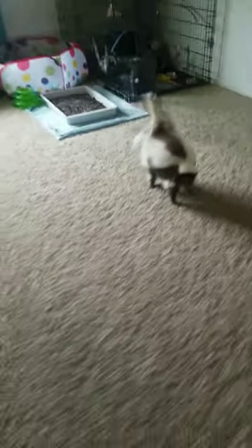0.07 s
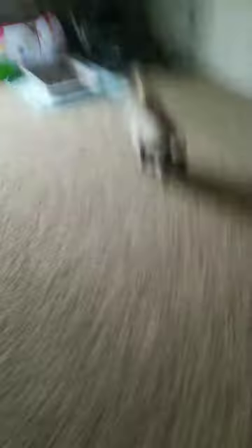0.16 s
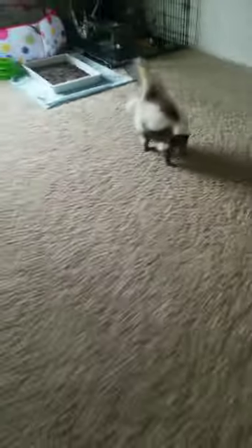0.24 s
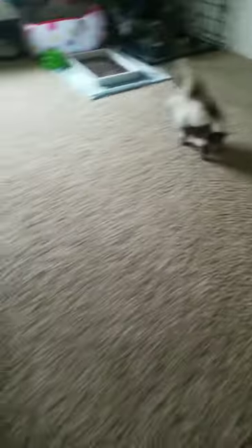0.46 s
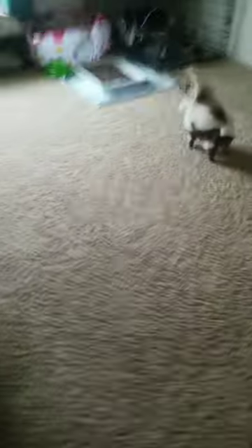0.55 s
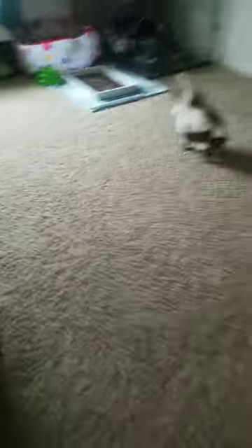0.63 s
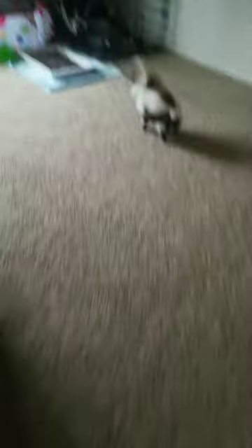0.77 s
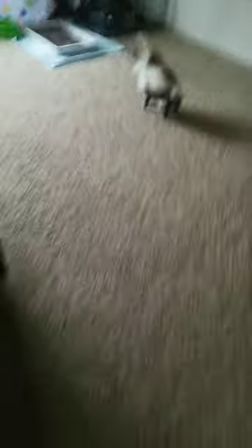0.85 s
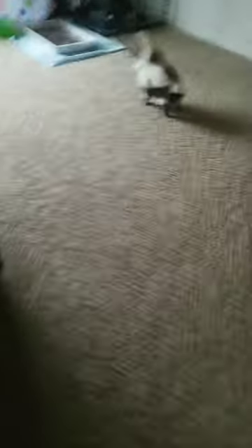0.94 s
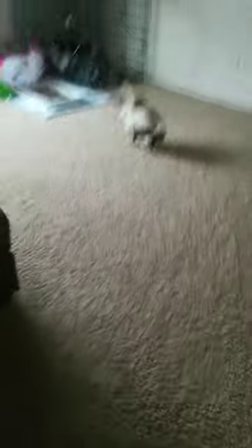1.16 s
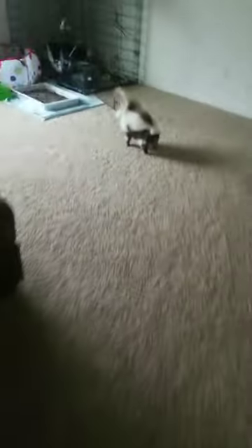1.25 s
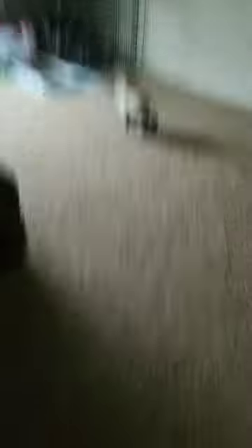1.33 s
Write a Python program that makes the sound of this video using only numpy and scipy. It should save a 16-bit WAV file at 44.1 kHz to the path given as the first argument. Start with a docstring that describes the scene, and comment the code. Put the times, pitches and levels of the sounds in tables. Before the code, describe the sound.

Close, muffled handling noise on a camera's case: a sharp tap, a short scratchy swell of rubbing and a few light knocks before it settles. Behind it, a skunk pads softly over carpet in a quiet room.

```python
"""A quiet room, heard from the microphone of a hand-held camera following a skunk over carpet.
Over the room's rumble and hiss, fingers rub the camera's case, close and dull. Farther off the pile
swishes faintly and soft footfalls thud through the floor. Light knocks on the case surround one hard
tap at 0.27 s. Near 0.75 s the rubbing swells and a finger catches, rasps and tears loose.
A few more knocks, swishes and thuds follow, and the hand settles."""
import sys
import numpy as np
from scipy import signal
from scipy.fft import rfft, irfft
from scipy.io import wavfile
from scipy.ndimage import uniform_filter1d

SR = 44100
rng = np.random.default_rng(int(sys.argv[2]) if len(sys.argv) > 2 else 0)


def pcm_store(signal):
    """Save signal as 16-bit PCM."""
    levels = np.round(np.clip(np.atleast_2d(signal), -1, 1) * 32767)
    wavfile.write(sys.argv[1], SR, levels.astype(np.int16).T)


N = 61739

# room tone, all around the microphone: f/Hz, relative density/dB
ROOM_SPECTRUM = [(20, -2.5), (45, 2), (70, 2), (150, -5.5), (300, -22), (600, -28.5), (900, -35.5),
                 (1130, -31), (1350, -22.5), (2400, -23.5), (3100, -39), (4700, -37), (5600, -33),
                 (6300, -29), (7300, -42), (9000, -41), (10100, -36.5), (11200, -41), (12500, -38.5),
                 (15500, -41)]
# slight drift of the room tone: t/s, level/dB
ROOM_DRIFT = [(0, -59.5), (0.35, -56.5), (0.48, -61), (0.7, -59.5), (1.15, -60.5), (1.28, -60.5),
              (1.4, -60.5)]
# how hard the hand rubs the case, right at the microphone: t/s, level/dB
RUB_LEVEL = [(0, -46.5), (0.05, -70.5), (0.2, -54), (0.255, -54), (0.29, -44), (0.33, -49.5), (0.375, -54),
             (0.405, -47.5), (0.46, -56), (0.505, -61), (0.53, -49), (0.565, -49.5), (0.6, -55),
             (0.64, -56), (0.685, -51.5), (0.704, -40.5), (0.728, -42), (0.745, -35), (0.778, -38.5),
             (0.826, -54.5), (0.838, -60.5), (0.85, -38.5), (0.875, -37), (0.91, -44), (0.932, -60),
             (1.11, -64.5), (1.21, -65), (1.28, -65.5), (1.312, -59.5), (1.35, -63), (1.4, -66.5)]
# rubbing heard through the housing: f/Hz, relative density/dB
RUB_SPECTRUM = [(30, -18.5), (70, -14), (120, 2), (180, 3), (270, -0.5), (380, -7.5), (520, -10.5),
                (700, -18), (1100, -29), (2200, -32), (3200, -43.5), (6000, -60), (15000, -68)]
# swishes down on the carpet: middle t/s, half width/s, level/dB, treble gain/dB
CARPET_SWISHES = [(0.17, 0.11, -69, 6.5), (0.571, 0.033, -62, 4), (0.683, 0.061, -66, 1.5),
                  (0.757, 0.037, -59.5, -14), (0.876, 0.044, -64.5, -13), (0.97, 0.059, -63, -11.5),
                  (1.078, 0.068, -61.5, 1)]
# hiss of the brushed pile: f/Hz, relative density/dB
SWISH_SPECTRUM = [(400, 1), (750, -2), (1100, -9.5), (1500, -1.5), (2000, 2), (2500, -2.5), (3150, -19),
                  (3900, -11.5), (4800, -18.5), (5600, -10.5), (6300, -5.5), (7700, -27.5), (9000, -27.5),
                  (10100, -18.5), (11200, -27), (12700, -20.5), (15000, -36)]
# footfalls through the floor: t/s, level/dB
FOOTFALLS = [(0.105, -48), (0.124, -45.5), (0.143, -47), (0.403, -43), (0.634, -42), (0.974, -42),
             (0.99, -47), (1.052, -54), (1.306, -52)]
# soft finger knocks on the case: t/s, force/dB, contact width/ms
FINGER_KNOCKS = [(0.167, -29, 3.7), (0.2075, -32.5, 0.52), (0.2123, -32, 1.9), (0.3013, -20.5, 0.8),
                 (0.4046, -39, 0.88), (0.4260, -36.5, 0.83), (0.537, -35.5, 0.63), (0.5625, -37, 0.36),
                 (0.739, -22.5, 0.53), (0.7815, -29.5, 1.08), (0.8455, -31, 0.65), (0.8520, -37, 0.52),
                 (0.8696, -28, 0.57), (1.3120, -50, 1.1)]
# a finger catching on the case: t/s, level/dB, decay/s
FINGER_RASPS = [(0.7404, -38, 0.0054), (0.7435, -39.5, 0.0049), (0.757, -45, 0.011), (0.7710, -50, 0.014)]
# hollow tone of the rasps: f/Hz, relative density/dB
RASP_SPECTRUM = [(200, 1), (380, 15), (600, 18), (850, -7), (1100, -15), (1350, 9.5), (1600, -10),
                 (2300, 2.5), (3200, -22), (4700, -16.5), (6300, -26), (8300, -46), (10300, -15),
                 (11500, -35), (15000, -32)]
# tiny snags inside the hardest rasps: t/s, level/dB
FINGER_SNAGS = [(0.7419, -49), (0.7442, -41.5), (0.748, -57)]
# bright tone of the snags: f/Hz, relative density/dB
SNAG_SPECTRUM = [(500, 6), (950, -9), (1350, 10.5), (1700, 7), (2300, -1.5), (3200, -12.5), (4600, -13),
                 (5400, -16), (6500, -12), (8300, -33.5), (10300, -14), (11500, -33), (13000, -27),
                 (15000, -25)]


def from_db(db):
    """Decibels to gain."""
    return 10 ** (np.asarray(db) / 20)


def seconds():
    """Time of each sample."""
    return np.arange(N) / SR


def level_curve(rows):
    """Gain over time from points of t/s, level/dB."""
    return from_db(np.interp(seconds(), *np.transpose(rows)))


def coloured(x, spectrum):
    """Shape a steady signal by points of f/Hz, level/dB, then scale it to unit power."""
    hz, db = np.transpose(spectrum)
    bin_hz = np.maximum(np.arange(N // 2 + 1) * SR / N, 1)
    gain = from_db(np.interp(np.log(bin_hz), np.log(hz), db))
    shaped = irfft(rfft(x) * gain, N)
    return shaped / np.sqrt(np.mean(shaped ** 2) + 1e-20)


def evened(x, samples):
    """Take the slow chance swings out of a noise, so that its level follows its envelope."""
    power = uniform_filter1d(uniform_filter1d(x ** 2, samples), samples)
    return x / np.sqrt(power + 1e-9)


def room_tone():
    """The room's low rumble and faint hiss, nearly steady."""
    return level_curve(ROOM_DRIFT) * coloured(rng.standard_normal(N), ROOM_SPECTRUM)


def rubbing(slips_per_s=2500, spread_db=3):
    """Skin sticks and slips on the case; the uneven slips reach the microphone dulled by the housing."""
    slipping = rng.random(N) < slips_per_s / SR
    strength = from_db(spread_db * np.minimum(rng.exponential(1, N), 4))
    slips = slipping * strength * rng.choice([-1, 1], N)
    return level_curve(RUB_LEVEL) * evened(coloured(slips, RUB_SPECTRUM), samples=350)


def swishes(treble_hz=4700):
    """A little way off, brushed carpet fibres hiss in smooth swells, some brighter than others."""
    hiss = coloured(rng.standard_normal(N), SWISH_SPECTRUM)
    treble = signal.sosfiltfilt(signal.butter(2, treble_hz, "high", fs=SR, output="sos"), hiss)
    out = np.zeros(N)
    for middle, half_width, db, treble_db in CARPET_SWISHES:
        swell = from_db(db) * np.exp(-.5 * ((seconds() - middle) / half_width) ** 2)
        out += swell * (hiss + (from_db(treble_db) - 1) * treble)
    return out


def thuds(floor_hz=52.5, t60_s=0.096, softness_hz=112):
    """Soft footfalls set the floor ringing low and briefly."""
    out = np.zeros(N)
    for start, db in FOOTFALLS:
        age = np.maximum(seconds() - start, 0)
        attack = 1 - np.exp(-2 * np.pi * softness_hz * age)
        decay = from_db(db - 60 * age / t60_s)
        out += attack * decay * np.sin(2 * np.pi * floor_hz * age)
    return out


def contact(at_s, width_ms):
    """A fingertip's smooth bump of force, of height 1."""
    return 1 - np.tanh((seconds() - at_s) / (width_ms / 1000)) ** 2


def soft_knocks(lift_s=0.0027, lift_share=0.35):
    """Force of fingers that press on the case and pull back more weakly as they lift off."""
    return sum(from_db(db) * (contact(at_s, width_ms) - lift_share * contact(at_s + lift_s, width_ms))
               for at_s, db, width_ms in FINGER_KNOCKS)


def hard_tap(at_s=0.26773, force_db=-11, width_ms=0.22, bounce_s=0.00077, bounce_db=-7):
    """Force of one hard tap on the case, with a quick bounce."""
    bounce = from_db(bounce_db) * contact(at_s + bounce_s, width_ms)
    return from_db(force_db) * (contact(at_s, width_ms) + bounce)


def struck_case(force, ring_hz=106.5, q=1.48):
    """The case around the microphone gives way below its pitch and rings briefly at it."""
    omega = 2 * np.pi * ring_hz
    resonant_highpass = signal.bilinear([1, 0, 0], [1, omega / q, omega ** 2], SR)
    return signal.lfilter(*resonant_highpass, force + 1e-18)


def rasps(attack_s=0.00058):
    """Short hollow scratches, very close, where a finger catches."""
    envelope = np.zeros(N)
    for start, db, decay_s in FINGER_RASPS:
        age = np.maximum(seconds() - start, 0)
        envelope += from_db(db) * np.tanh(age / attack_s) ** 2 * np.exp(-age / decay_s)
    return envelope * evened(coloured(rng.standard_normal(N), RASP_SPECTRUM), samples=250)


def snags(decay_s=0.0012):
    """A few crisp ticks as the finger tears loose."""
    t = seconds()
    envelope = sum(from_db(db) * (t >= start) * np.exp(-np.abs(t - start) / decay_s)
                   for start, db in FINGER_SNAGS)
    return envelope * evened(coloured(rng.standard_normal(N), SNAG_SPECTRUM), samples=60)


def scene():
    """Room, skunk and close handling noise at one microphone."""
    knocks = struck_case(soft_knocks() + hard_tap())
    return (room_tone() + rubbing() + swishes() + thuds() + knocks + rasps() + snags())[None]


def record(dry):
    """The camera cuts the top of the treble steeply."""
    cutoff_hz = 15700
    return signal.sosfilt(signal.ellip(12, .1, 70, cutoff_hz, fs=SR, output="sos"), dry)


dry = scene()
out = record(dry)
pcm_store(out)
```